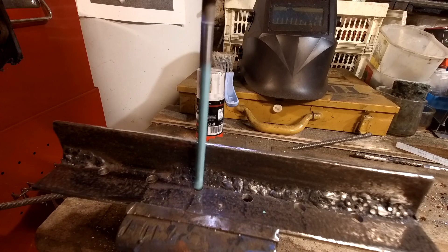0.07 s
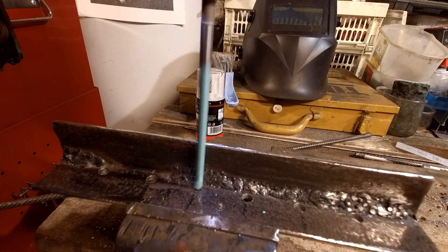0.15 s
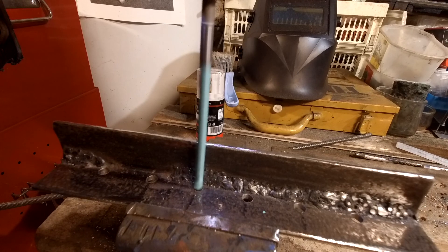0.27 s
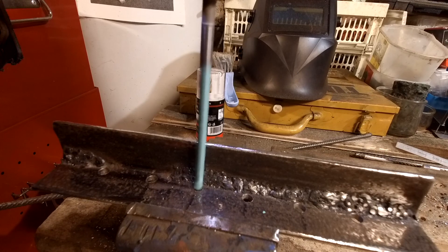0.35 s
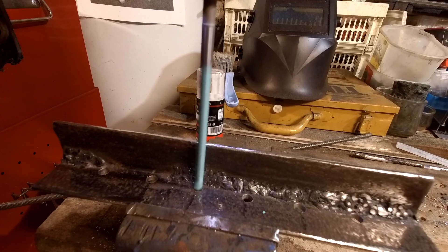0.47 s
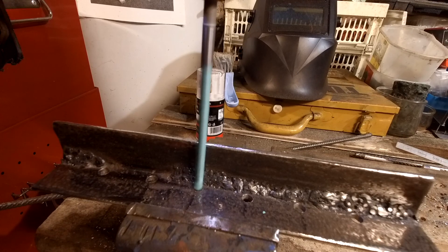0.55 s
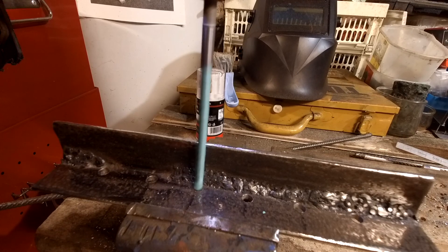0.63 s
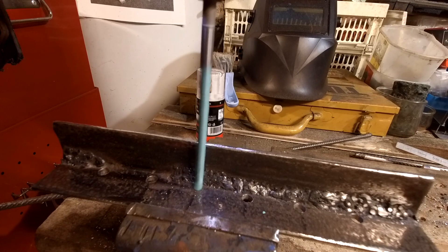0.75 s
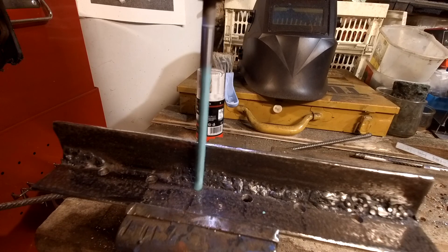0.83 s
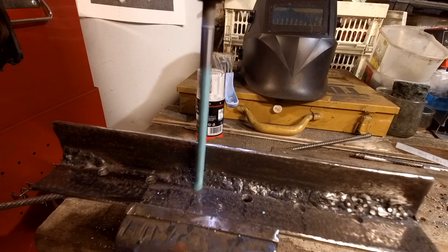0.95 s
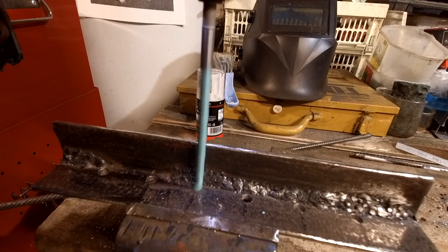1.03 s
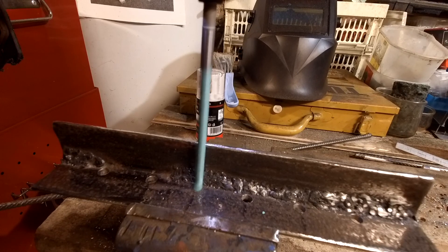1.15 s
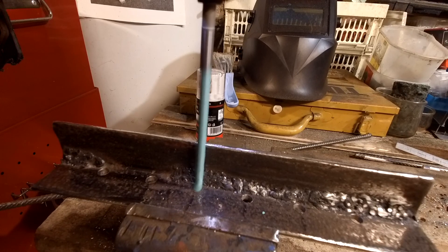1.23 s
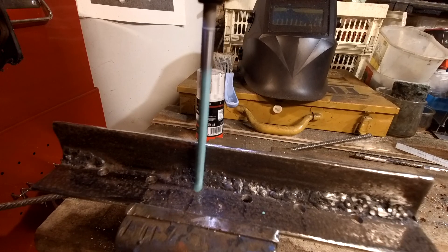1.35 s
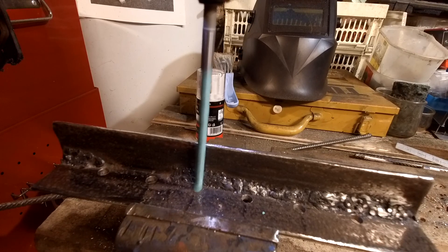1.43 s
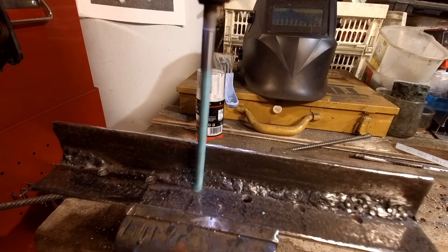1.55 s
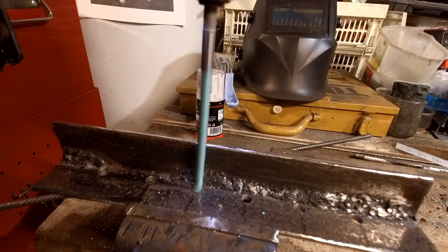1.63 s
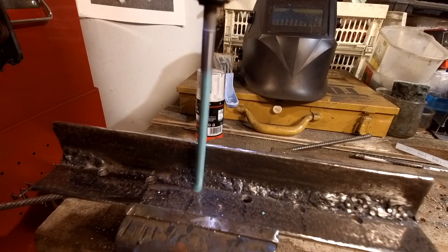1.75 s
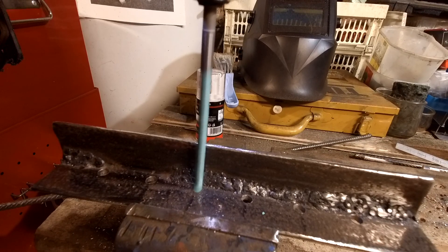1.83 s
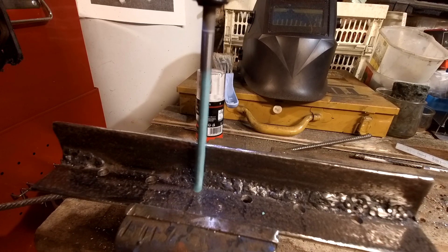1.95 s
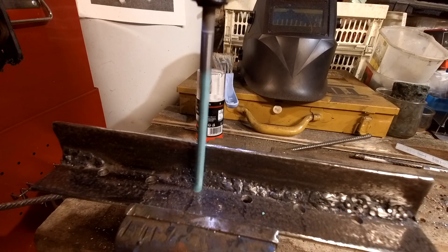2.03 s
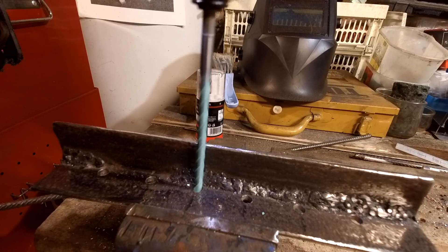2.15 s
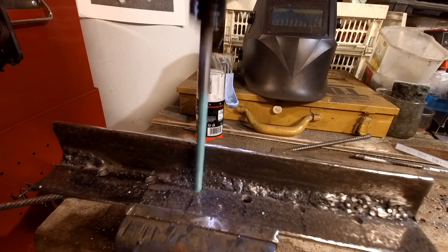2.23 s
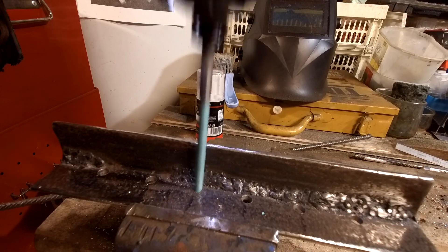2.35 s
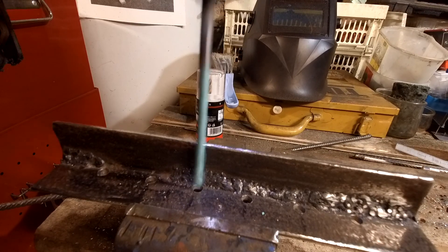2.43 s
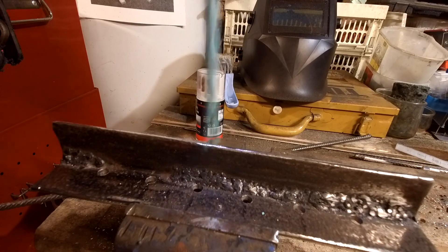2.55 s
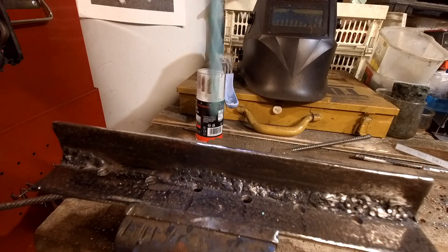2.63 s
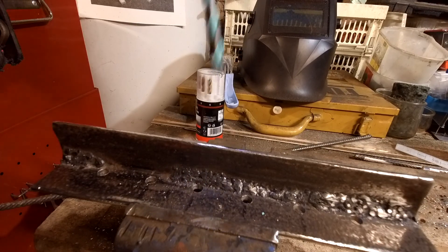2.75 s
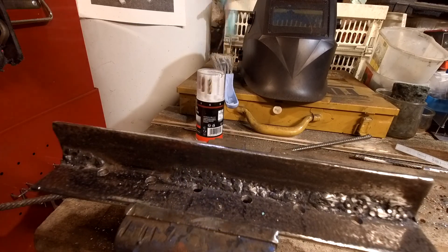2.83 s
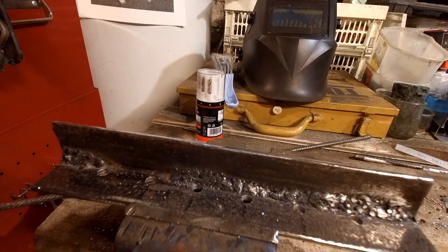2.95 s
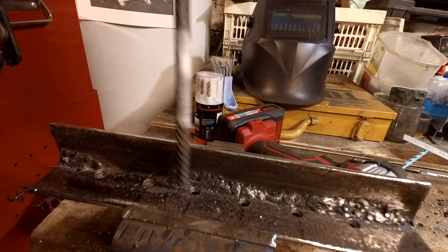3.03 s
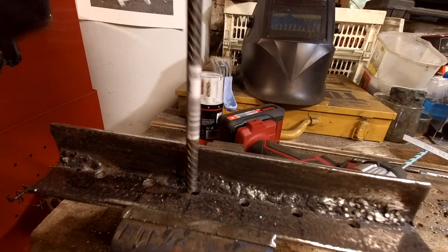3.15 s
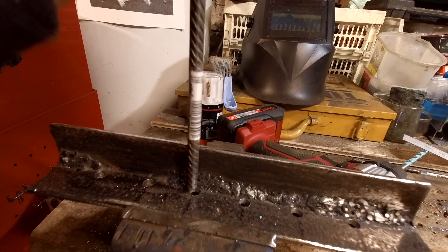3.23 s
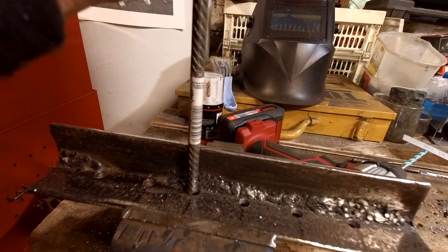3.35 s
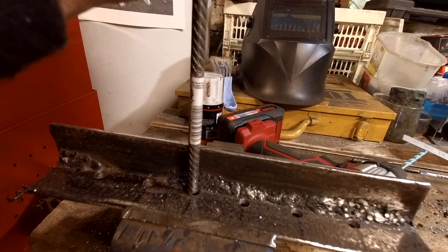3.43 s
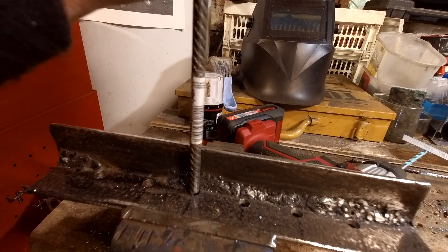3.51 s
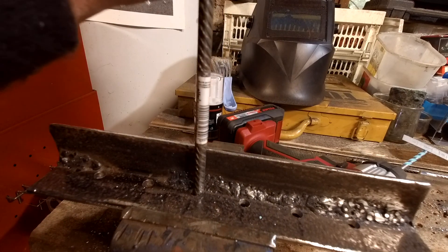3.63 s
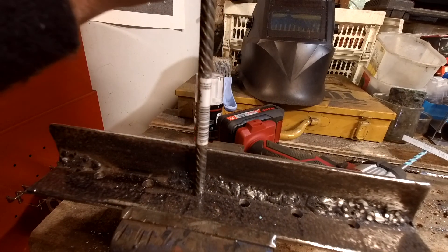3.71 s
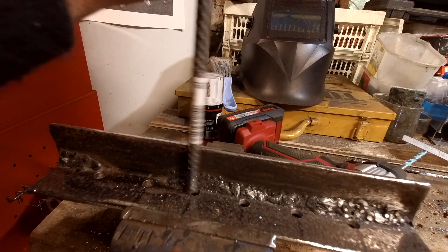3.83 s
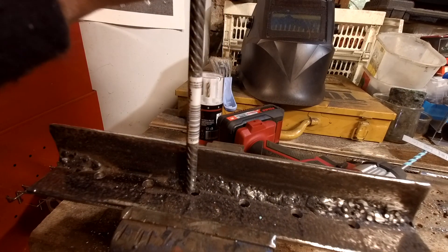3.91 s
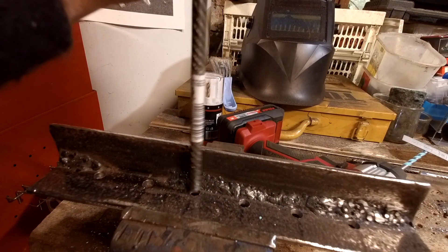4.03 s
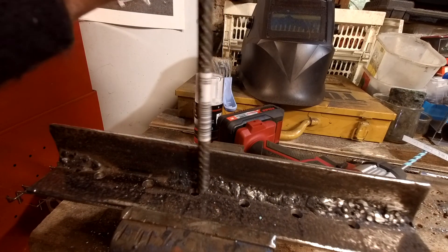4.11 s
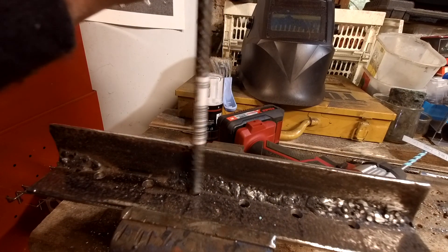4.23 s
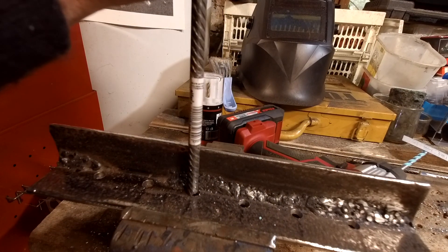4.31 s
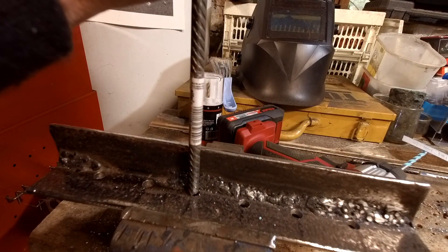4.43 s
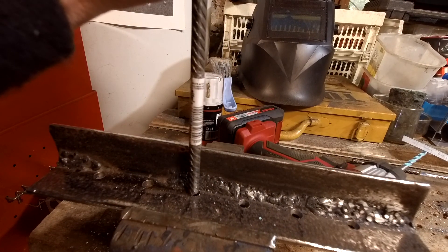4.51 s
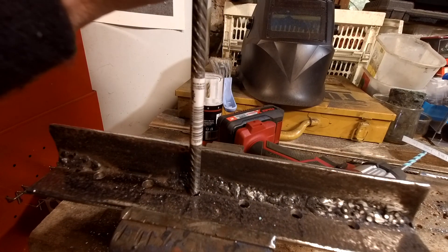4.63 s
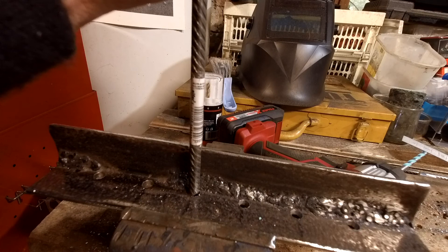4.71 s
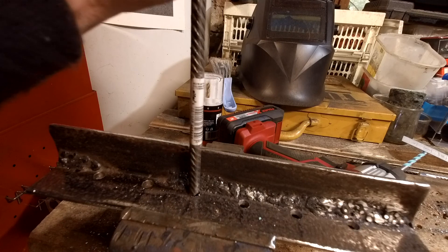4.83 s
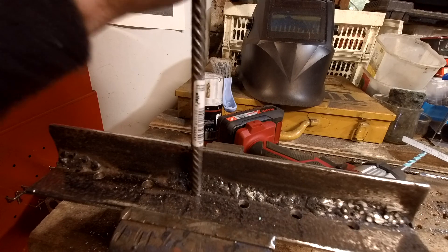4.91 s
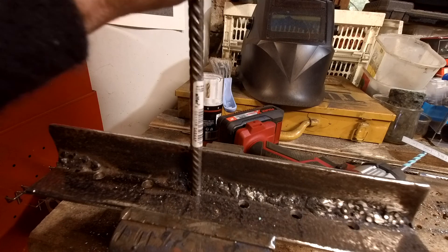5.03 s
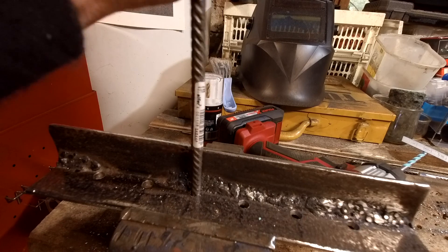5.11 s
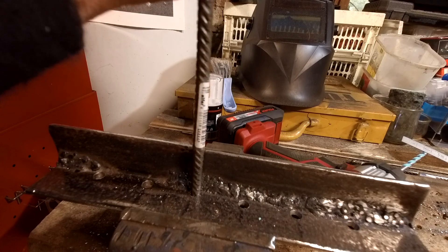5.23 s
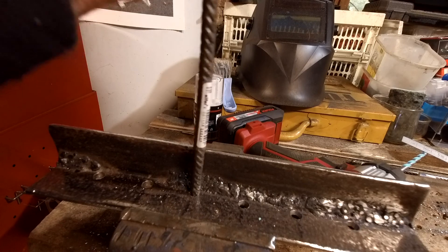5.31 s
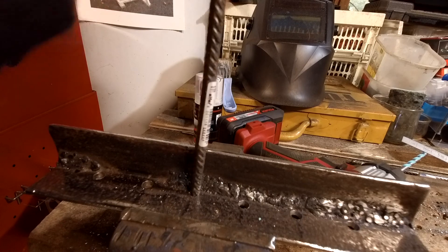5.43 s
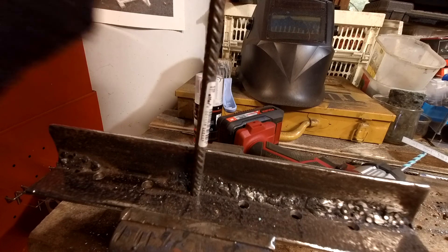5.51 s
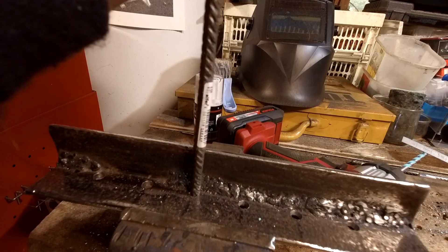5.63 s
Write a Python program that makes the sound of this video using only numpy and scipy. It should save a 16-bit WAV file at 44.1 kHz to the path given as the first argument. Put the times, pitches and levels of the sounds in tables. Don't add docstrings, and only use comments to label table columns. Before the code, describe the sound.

Loud gritty drilling from the very start: whining motor, tearing metal, bright snapping chips, peaks flattened at the close microphone. The pitch sags under load, jumps up at breakthrough, catches with a short harsh grunt, then drops quickly to silence. A low room rumble remains, with irregular small knocks of rod on bar, a faint dry rub and a final crisp click in a short, dull room echo.

```python
import sys
import numpy as np
from scipy import signal
from scipy.fft import rfft, irfft
from scipy.io import wavfile
from scipy.ndimage import uniform_filter1d

SR = 44100
rng = np.random.default_rng(int(sys.argv[2]) if len(sys.argv) > 2 else 0)


def magnitude_from_level(level_db):
    exponent = np.asarray(level_db, float) / 20
    return 10 ** exponent


def waveform_to_disk(signal):
    frames = np.transpose(np.atleast_2d(signal))
    scaled = np.clip(frames, -1, 1) * 32767
    samples = np.round(scaled).astype(np.int16)
    wavfile.write(sys.argv[1], SR, samples)


N = 249605
TIME = np.arange(N) / SR
RUN = int(2.85 * SR)
GEAR = 19.5
BREAKTHROUGH_S = 2.183
RUB_DB = -33.5
SNAG_S, SNAG_HOLD_S, SNAG_FADE_DB_S = 2.348, 0.016, 700

# time in seconds, pole whine in Hz, whine level in dB, gear mesh level in dB.
BORING = [(0, 2965, -19.5, -5), (.07, 2936, -20, 6), (.11, 2875, -38, -9), (.3, 2845, -27.5, -2.5),
          (.46, 2832, -27.5, -1.5), (.5, 2673, -35.5, -5), (.62, 2724, -23.5, 2), (.75, 2602, -29, 2),
          (.88, 2710, -28, -2), (1.0, 2641, -26.5, 0.5), (1.2, 2660, -26, 0.5), (1.36, 2601, -26, -0.5),
          (1.47, 2653, -25.5, -0.5), (1.62, 2608, -23.5, 0), (1.84, 2582, -27, -0.5),
          (1.93, 2466, -24.5, -2), (2.165, 2599, -35.5, -7.5)]
# time in seconds, pole whine in Hz, whine level in dB, gear mesh in dB.
RUNNING_FREE = [(2.21, 2948, -30, 0), (2.35, 2980, -31, 2.5), (2.38, 2825, -30, 0), (2.42, 2960, -46, 0.5),
                (2.46, 3052, -27, 2), (2.535, 3093, -21.5, 3.5), (2.56, 3094, -25, 0),
                (2.585, 2985, -25.5, -1.5)]
# frequency in Hz, level in dB per Hz.
SIZZLE = [(2940, -33.5), (5000, -1), (5530, 1.5), (8560, -5), (9700, 0), (10600, -3.5), (12800, -2.5),
          (14500, -3), (15400, -7), (15900, -28)]


def curves(table, size=N):
    s, *columns = np.transpose(table)
    return [np.interp(TIME[:size], s, c) for c in columns]


def unit(x):
    return x / np.sqrt(np.mean(x ** 2))


def colour(x, points):
    hz, db = np.transpose(points)
    grid_hz = np.linspace(1, SR / 2, 4097)
    log_gain = np.interp(np.log(grid_hz), np.log(hz), db) * np.log(10) / 20
    ceps = irfft(log_gain)
    ceps[1:4096] *= 2
    ceps[4097:] = 0
    response = irfft(np.exp(rfft(ceps)))
    return signal.fftconvolve(x, response)[:len(x)]


def ring(x, hz, width):
    return signal.lfilter(*signal.iirpeak(hz, hz / width, fs=SR), x)


def walk(rate, size=N):
    k = int(SR / rate)
    held = np.repeat(rng.standard_normal(N // k + 1), k)[:size]
    return 1.2 * uniform_filter1d(held, k)


def grit(scatter_db, size=N):
    return unit(rng.standard_normal(size) * magnitude_from_level(scatter_db * rng.exponential(size=size)))


def add(out, s, x):
    i = round(s * SR)
    out[i:i + len(x)] += x[:N - i]


def swell(s, attack_s, hold_s, fade_db_s):
    t = TIME[:RUN] - s
    return np.clip(t / attack_s, 0, 1) * magnitude_from_level(-fade_db_s * np.maximum(t - attack_s - hold_s, 0))


def resonate(force, table):
    out = 0
    for hz, width, db in table:
        wane = magnitude_from_level(2.2 * walk(35, RUN))
        out = out + wane * magnitude_from_level(db) * np.sqrt(width) * unit(ring(force, hz, width))
    return unit(out)


def hum():
    # frequency in Hz, level in dB per Hz.
    air_colour = [(12, -21.5), (20, -2), (44, -4.5), (65, -16), (130, -7.5), (162, -20), (247, -6.5),
                  (355, -7), (419, -8), (539, -17), (603, -17.5), (693, -17), (891, -21), (13700, -54),
                  (15800, -60.5)]
    # frequency in Hz, level in dB.
    machine_lines = [(35, -69), (128, -64.5), (345, -66.5), (544, -64), (1120, -70), (2256, -74),
                     (6551, -97.5)]
    air = unit(colour(rng.standard_normal(N), air_colour))
    rumble = signal.sosfilt(signal.butter(2, 700, fs=SR, output="sos"), air)
    air = air + rumble * (magnitude_from_level(1.1 * walk(10)) - 1)
    lines = 0
    for hz, db in machine_lines:
        drift = .004 * hz ** 0.73 * walk(31)
        lines = lines + magnitude_from_level(db + 52.5 + 1.5 * walk(10)) * np.sin(2 * np.pi * hz * TIME + drift)
    faint_hiss = magnitude_from_level(-47) * unit(ring(air, 6650, 250))
    early_db = -3.5 * np.clip(.5 - (TIME - 3.05) / 0.066, 0, 1)
    return magnitude_from_level(-48 + early_db) * (air + lines + faint_hiss)


def whine(table, turns, hz, load):
    # frequency in Hz, width in Hz, lift in dB.
    casing = [(210, 160, -14), (740, 150, 8), (1320, 200, 5), (2670, 200, 8), (3480, 500, 5),
              (5250, 1000, -20)]
    out, spin = 0, 2 * np.pi * turns / GEAR
    for k, db, wobble_db, blur in table:
        lift_db = sum(up_db / (1 + (2 * (k * hz - f) / w) ** 2) for f, w, up_db in casing)
        throb = (.7 + .8 * load) * np.sin(2 * spin + k) + load * np.sin(4 * spin + k)
        throb = throb + (0.3 + 0.25 * load) * walk(120, RUN)
        shake = (.4 + 1.2 * load) * walk(150, RUN) + 2.8 * load * np.sin(2 * spin + k)
        phase = 2 * np.pi * k * turns + blur * shake
        out = out + magnitude_from_level(db + lift_db + wobble_db * throb) * np.sin(phase)
    return np.sqrt(2) * out


def motor_tones(turns, hz, load, octaves):
    # multiple of rotor speed, level in dB, wobble in dB, phase blur in radians.
    poles = [(2, -24, 3, .9), (8, -2, 1.6, 0.45)]
    gears = [(1.8, -11, 4, 1.4), (5.1, -5, 4, 1.6), (10.75, 2.5, 3.4, 1.3), (21.2, -16, 4, 5),
             (26.4, -19, 4, 5.5), (30, -32, 2, .6)]
    slots = [(4, -4.5, 2.5, 0.098), (16, -7.5, 6, 2)]
    unbalance = [(1, 0, 1.2, .2), (.5, -12, 3, .3)]
    squeal = [(16, 0, 1, .2)]
    _, pole_db, mesh_db = curves(BORING + RUNNING_FREE, RUN)
    jolt = swell(2.6005, attack_s=.003, hold_s=.0075, fade_db_s=3000)
    pole_db = pole_db - 17.5 * octaves + 8.5 * jolt
    gear_db = mesh_db - 38.5 + 11 * load - 21 * octaves
    slot_db = -31 - 6 * octaves
    shake_db = -33.5 - 3.5 * load - 20 * octaves
    tones = magnitude_from_level(pole_db) * whine(poles, turns, hz, load)
    tones = tones + magnitude_from_level(gear_db) * whine(gears, turns, hz, load)
    tones = tones + magnitude_from_level(slot_db) * whine(slots, turns, hz, load)
    tones = tones + magnitude_from_level(shake_db) * whine(unbalance, turns, hz, load)
    squeal_gain = magnitude_from_level(-34) * swell(2.631, attack_s=0.004, hold_s=0.012, fade_db_s=2500)
    return tones + squeal_gain * whine(squeal, turns, hz, load)


def fan(turns, load, octaves):
    # frequency in Hz, level in dB per Hz.
    fan_colour = [(24, -46), (40, -22.5), (327, -32), (380, -11), (1330, -13.5), (1540, -8), (2880, -11.5),
                  (3110, -7.5), (3350, -11), (4200, -12), (5000, -22), (6260, -26.5), (15800, -59.5)]
    beat = 1 + 0.4 * np.sin(2 * np.pi * turns)
    rush = grit(1.0, RUN) * beat * magnitude_from_level(walk(40, RUN))
    return magnitude_from_level(-28 - 6 * load - 4.5 * octaves) * unit(colour(rush, fan_colour))


def brushes(octaves):
    sparks = grit(1.8, RUN) * magnitude_from_level(3.6 * walk(130, RUN))
    hiss = unit(ring(ring(sparks, 7600, 5600), 7600, 5600))
    return magnitude_from_level(-42.5 - 35 * octaves) * hiss


def brake():
    # frequency in Hz, width in Hz, level in dB.
    shudder_modes = [(734, 102, -21), (1670, 530, 2), (2730, 630, 2), (3500, 107, 0.5), (4300, 400, -31)]
    # time in seconds, frequency in Hz, level in dB, length in seconds.
    part_rings = [(2.653, 735, -26, 0.0053), (2.616, 1290, -22, .003), (3, 2700, -11, .003),
                  (2.1, 3300, -3, .003), (2.654, 2670, -22.5, 0.0044), (2.2, 3100, -22, .005),
                  (2.637, 480, -29, 0.0042), (2.58, 11550, -60, .016)]
    t = TIME[:RUN]
    shudder = swell(2.632, attack_s=0.023, hold_s=0.015, fade_db_s=900)
    shudder = shudder + magnitude_from_level(-22.5) * swell(2.632, attack_s=0.023, hold_s=0.051, fade_db_s=300)
    out = magnitude_from_level(-31) * shudder * ring(resonate(grit(2.0, RUN), shudder_modes), 2200, 4100)
    for s, hz, db, length_s in part_rings:
        out = out + magnitude_from_level(db) * np.exp(-((t - s) / length_s) ** 2) * np.sin(2 * np.pi * hz * t)
    return out


def motor(turns, hz, load, octaves):
    stop = np.clip((2.69 - TIME[:RUN]) / 0.023, 0, 1) ** 2
    running = motor_tones(turns, hz, load, octaves) + fan(turns, load, octaves) + brushes(octaves)
    return running * stop + brake()


def contact():
    # time in seconds, cutting level in dB.
    feed = [
        (0, -26.5),
        (.24, -21.5),
        (.64, -18.5),
        (1.0, -16.5),
        (1.26, -17),
        (2.05, -13.5),
        (2.12, -10),
        (2.165, -14.5),
        (2.183, -34.5),
    ]
    # time in seconds, change in dB, length in seconds.
    catches = [(0.129, 4, 0.1), (0.68, 2.5, 0.099), (0.859, -7.5, 0.011), (1.027, 3.5, 0.03),
               (1.111, -3.5, 0.061), (1.134, 3, 0.03), (2.109, -5, 0.014), (2.18, 3.5, 0.0079),
               (2.228, 6.5, 0.01), (2.256, 12, 0.0074), (2.279, 5.5, 0.0098), (2.3, 12, 0.014),
               (2.331, 13.5, 0.0065)]
    t = TIME[:RUN]
    catch_db = sum(db * np.exp(-(2 * (t - s) / d) ** 2) for s, db, d in catches)
    rub = magnitude_from_level(RUB_DB - 499 * np.maximum(t - 2.39, 0))
    rise_db = 9.5 * np.clip((t - SNAG_S) / SNAG_HOLD_S - 1, -1, 0)
    snag = magnitude_from_level(-10 + rise_db) * swell(SNAG_S, .002, SNAG_HOLD_S, SNAG_FADE_DB_S)
    loose_db = 20 * np.log10(rub + snag)
    return catch_db + np.where(t < BREAKTHROUGH_S, curves(feed, RUN)[0], loose_db)


def cutting(turns):
    # frequency in Hz, width in Hz, level in dB.
    bar_modes = [(846, 13, 3), (1156, 34, -4.5), (1309.4, 27.8, 5.5), (1624, 28, 2.5), (1710, 31, -16.5),
                 (2410, 50, -2), (3000, 17, -14.5), (2956, 59, 7.5), (3250, 79, 4), (3960, 5.7, -12.5),
                 (5040, 150, -4.5), (5330, 21, -5.5), (5290, 23, -10.5)]
    bench_modes = [(282, 17, -6), (306, 22, 2), (417.5, 36, 0), (610, 350, -6)]
    bit_modes = [(5500, 410, 2), (6730, 200, 6), (8300, 140, -8), (9860, 280, 2), (12600, 540, -8),
                 (14380, 760, 3)]
    # frequency in Hz, level in dB per Hz.
    tearing_colour = [(15, -46), (25, -17.5), (137, -27.5), (404, -4.5), (523, -9), (839, 0), (1040, -2.5),
                      (1310, -1.5), (2600, 0.5), (2790, 0), (3450, -1.5), (4170, -5.5), (7000, -24.5),
                      (9100, -41.5), (15400, -120)]
    cut_db = contact()
    spin = 2 * np.pi * turns / GEAR
    free = TIME[:RUN] > BREAKTHROUGH_S
    feed_db = (cut_db + 17.5) * ~free
    treble_db = -7.5 - 4.0 * free - 0.02 * feed_db
    bench_db = -8 + 1.2 * free - 1.1 * feed_db
    bite_db = 0.6 * np.sin(spin) + (1.2 + 3.0 * free) * np.sin(2 * spin + 2.5)
    bite_db = bite_db + 1.1 * np.sin(4 * spin + walk(6.5, RUN))
    burst_db = bite_db + .8 * walk(15, RUN) + 2.0 * walk(90, RUN)
    snag = swell(SNAG_S - SNAG_HOLD_S, SNAG_HOLD_S / 2, 2 * SNAG_HOLD_S, SNAG_FADE_DB_S)
    burst_db = burst_db * (1 - .7 * snag)
    force = grit(1.8, RUN) * magnitude_from_level(0.9 * burst_db)
    body = magnitude_from_level(-1.0 + 0.2 * feed_db) * resonate(force, bar_modes)
    body = body + magnitude_from_level(3.5) * unit(colour(force, tearing_colour))
    body = body + magnitude_from_level(bench_db - 5.0) * resonate(force, bench_modes)
    chips = grit(2.5, RUN)
    chips = chips * magnitude_from_level(0.45 * burst_db + 3.2 * walk(300, RUN) + 1.2 * walk(110, RUN))
    sizzle = unit(colour(chips, SIZZLE)) + magnitude_from_level(-9.0 + 10.0 * free) * resonate(chips, bit_modes)
    return magnitude_from_level(cut_db + 0.5) * (body + magnitude_from_level(treble_db) * sizzle)


def blows(table, fade_s):
    s, db = np.transpose(table)
    kick = np.zeros(RUN)
    kick[(s * SR).astype(int)] = magnitude_from_level(db)
    return signal.lfilter([1], [1, -np.exp(-1 / (fade_s * SR))], kick)


def snapping():
    # time in seconds,
    # level in dB.
    snaps = [(0.0254, -29), (0.0545, -7), (0.104, -9), (0.1171, -15.5), (0.2214, -15.5), (0.255, -14.5),
             (0.2927, -22), (0.3104, -21.5), (0.3296, -4.5), (0.376, -10), (0.4205, -21), (0.4386, -16),
             (0.4506, -12), (0.4773, -17.5), (0.5185, -16.5), (0.5432, -10.5), (0.5863, -15), (0.6435, -10),
             (0.8175, -13), (0.8413, -13), (0.8625, -11), (0.9023, -6), (0.9223, -6.5), (0.9437, -12),
             (0.9567, -12.5), (1.0216, -12), (1.0967, -13.5), (1.1118, -8.5), (1.1252, -9.5), (1.1455, -9),
             (1.2997, -15.5), (1.3314, -14.5), (1.4746, -16.5), (1.487, -13.5), (1.505, -13),
             (1.5286, -13.5), (1.5933, -13), (1.6244, -12.5), (1.6397, -10), (1.6831, -12.5),
             (1.7125, -12.5), (1.7965, -7.5), (1.8497, -12.5), (1.8695, -14), (1.918, -8.5), (1.9753, -14),
             (2.002, -12), (2.0353, -14), (2.0519, -11.5), (2.0914, -8.5), (2.116, -6.5), (2.142, -4.5),
             (2.1791, -9), (2.3002, -20), (2.3501, -10.5),
             (2.1746, -12), (2.2228, -27.5), (2.2305, -26), (2.2478, -17), (2.267, -17),
                   (2.279, -21.5), (2.3266, -27.5)]
    # time in seconds, level in dB.
    bites = [(0.061, -20), (0.097, -18), (0.177, -9), (0.219, -13.5), (0.259, -13), (0.339, -13),
             (0.415, -14.5), (0.469, -12), (0.498, -17.5), (0.58, -10.5), (0.612, -23), (0.663, -6),
             (0.726, -8.5), (0.769, -21), (0.817, -20), (0.92, -20), (0.955, -16), (1.06, -15.5),
             (1.187, -16.5), (1.27, -18.5), (1.33, -21.5), (1.371, -15.5), (1.414, -12.5), (1.505, -14.5),
             (1.569, -17), (1.651, -15.5), (1.702, -10.5), (1.735, -16), (1.78, -16), (1.832, -14),
             (1.937, -8.5), (1.981, -15), (2.048, -15), (2.106, -9), (2.368, -10)]
    # frequency in Hz, width in Hz, level in dB.
    shank_modes = [(9950, 80, 0), (12700, 160, -1.5), (14310, 240, 1.5)]
    spit = grit(1.4, RUN) * blows(snaps, fade_s=0.0042)
    shank = sum(magnitude_from_level(db + 3) * ring(spit, hz, width) for hz, width, db in shank_modes)
    dig = rng.standard_normal(RUN) * blows(bites, fade_s=0.0066)
    web_hz, web_width_hz = 831, 71
    web = ring(dig, web_hz, web_width_hz) * np.sqrt(SR / np.pi / web_width_hz)
    return magnitude_from_level(-9) * (colour(spit, SIZZLE) * magnitude_from_level(4.5) + shank) + magnitude_from_level(-1.5) * web


def rattle_of_gears(turns, hz, load):
    # multiple of rotor speed, level in dB, wobble in dB, phase blur in radians.
    gear_knocks = [(.7, 12, 1, .2), (16, 4, 5, 4), (21.3, -6, 5, 5), (26.6, -6, 5, 6)]
    free = (TIME[:RUN] > BREAKTHROUGH_S) & (TIME[:RUN] < SNAG_S)
    knock_db = 1.6 * np.minimum(contact() - RUB_DB, 9)
    return free * magnitude_from_level(-45 + knock_db) * whine(gear_knocks, turns, hz, load)


def drill():
    driven_hz = curves(BORING + RUNNING_FREE, RUN)[0]
    sag = (3017 - driven_hz) / 325.7
    load = np.clip(sag, .1, 1)
    strain = np.clip(sag, .1, 2)
    braked_s = uniform_filter1d(np.maximum(TIME[:RUN] - 2.59, 0), int(.04 * SR))
    pole_hz = np.maximum(driven_hz - 24500 * braked_s, driven_hz / 5)
    hz = pole_hz / 8 * (1 + .007 * strain ** 2 * walk(100, RUN))
    turns = np.cumsum(hz) / SR
    octaves = np.log2(driven_hz / pole_hz)
    sound = motor(turns, hz, load, octaves) + cutting(turns)
    return sound + snapping() + rattle_of_gears(turns, hz, load)


def vice():
    out, t = np.zeros(N), TIME[:SR // 2]
    thrum = np.sin(2 * np.pi * 88 * t) * (1 - np.exp(-t / .03)) * np.exp(-t / 0.076)
    add(out, 2.38, magnitude_from_level(-28.5) * thrum)
    return out


def clicks():
    # time in seconds, peak in dB, centre in Hz, width in Hz, tail in dB.
    click_list = [(2.815, -84.5, 6560, 3005, 20.5), (3.001, -72.5, 5020, 4030, 8.5),
                  (3.078, -42.5, 2500, 5000, -29), (5.395, -35, 1850, 700, -24),
                  (5.5407, -28.5, 4170, 2980, -26), (5.5425, -35.5, 12100, 7040, -23.5),
                  (5.541, -36, 1300, 1500, -18), (5.64, -73, 6000, 8000, 8.5)]
    out, t = np.zeros(N), TIME[:SR // 4]
    for s, db, hz, width, tail_db in click_list:
        shape = np.exp(-t / 0.00073) + magnitude_from_level(tail_db) * np.exp(-t / 0.032)
        burst = ring(rng.standard_normal(len(t)) * shape, hz, width)
        burst = ring(burst, hz, min(2 * width, SR / 3))
        add(out, s, magnitude_from_level(db + 0.5) * burst * np.sqrt(SR / 4 / width))
    return out


def struck(table, spread_db, detune):
    t = TIME[:SR // 4]
    hz, db, t60 = np.array(table).T[:, :, None]
    size = magnitude_from_level(db + spread_db * rng.standard_normal(hz.shape))
    hz = hz * (1 + detune * rng.standard_normal(hz.shape))
    decay = np.exp(-np.log(1000) * t / (.75 * t60))
    out = (size * np.sin(2 * np.pi * hz * t) * decay).sum(0)
    return out / np.abs(out).max()


def blow_chatter():
    chatter = rng.standard_normal(1500) * magnitude_from_level(2 * rng.exponential(size=1500))
    chatter *= np.exp(-TIME[:1500] / .0085)
    chatter[:14] += 2.4 * np.hanning(14)
    return chatter / np.sqrt(np.sum(chatter ** 2))


def taps():
    # time in seconds, bar level in dB, rod level in dB, tip level in dB.
    tap_list = [(3.212, -47.5, -47, -74), (3.247, -48, -51, -69.5), (3.349, -72, -55, -68),
                (3.471, -53, -51, -77.5), (3.497, -55.5, -52, -76), (3.563, -59, -48, -64),
                (3.582, -50.5, -43, -66.5), (3.6, -61, -46, -61), (3.621, -52, -46, -61.5),
                (3.636, -41, -60, -69), (3.776, -55, -47, -65), (3.809, -45, -43.5, -66),
                (3.82, -49, -40.5, -55), (3.859, -61, -60, -75), (3.9, -57, -67, -75),
                (3.961, -58, -47, -74), (4.151, -58, -54.5, -76), (4.225, -61, -45, -65),
                (4.244, -49.5, -66, -73.5), (4.272, -71, -56, -73), (4.492, -60, -57, -77),
                (4.781, -59.5, -48.5, -63.5), (4.797, -46, -55, -73.5), (4.828, -46, -51, -77),
                (4.839, -28.5, -69, -78.5), (5.042, -56, -64, -76), (5.229, -55, -52.5, -68.5),
                (5.27, -52.5, -63, -74.5)]
    # time in seconds, level in dB.
    flange_taps = [(3.812, -57), (3.826, -46), (4.802, -50)]
    # frequency in Hz, level in dB, fade in seconds (60 dB are lost in three
    bar_modes = [(285, -6, 0.14), (407, -2, 0.13), (556, -10, 0.05), (662, -6.5, 0.13), (840, 3, 0.11),
                 (1000, -6.5, 0.065), (1200, -6, 0.084), (1325, -3, 0.17), (1870, -21, .05),
                 (2450, -11, 0.11), (2690, -13, 0.073), (2960, -17, 0.18), (3160, -23, 0.079),
                 (3740, -22, 0.04)]
    rod_modes = [(2310, -4, .03), (2710, -1.5, 0.051), (3300, 0, 0.036), (3810, 4, 0.03), (4480, 2, 0.033),
                 (5120, -4, 0.03), (6000, -10, 0.022), (6450, -13, 0.025)]
    tip_modes = [(7300, -5, .025), (8400, -4, .025), (9000, 7, 0.031), (10700, 2, .02), (11400, -3, .02),
                 (12700, -4, .02), (13470, -5, .02), (14550, -8, .02)]
    out, t = np.zeros(N), TIME[:SR // 4]
    flange = np.sin(2 * np.pi * 1650 * t) * np.exp(-t / .01)
    for s, bar_db, rod_db, tip_db in tap_list:
        chatter = blow_chatter()
        flange_db = max(rod_db - 10, bar_db - 24.5)
        steel = magnitude_from_level(bar_db + 11.5) * struck(bar_modes, 1.3, 0.0037)
        steel = steel + magnitude_from_level(flange_db + 4.0) * flange
        steel = steel + magnitude_from_level(rod_db + 5.5) * struck(rod_modes, 2.5, .02)
        steel = steel + magnitude_from_level(tip_db + 11.5) * struck(tip_modes, 3.8, .03)
        add(out, s, signal.fftconvolve(steel, chatter))
        bar_rattle = ring(ring(ring(chatter, 1700, 1900), 1700, 1900), 1700, 1900)
        rod_rattle = ring(ring(ring(chatter, 4000, 5000), 4000, 5000), 4000, 5000)
        tip_rattle = ring(ring(chatter, 10500, 8900), 10500, 9000)
        rattle = magnitude_from_level(bar_db + 21) * bar_rattle + magnitude_from_level(rod_db + 19.5) * rod_rattle
        add(out, s, rattle + magnitude_from_level(tip_db + 16.0) * tip_rattle)
    for s, db in flange_taps:
        add(out, s, magnitude_from_level(db + 6) * signal.fftconvolve(flange, blow_chatter()))
    return out


def scraping():
    # time in seconds, level in dB.
    stroke = [
        (4.0, -70.5),
        (4.1, -53.5),
        (4.36, -47),
        (4.5, -55),
        (4.8, -57),
    ]
    # frequency in Hz, level in dB per Hz.
    scrape_colour = [(530, -48), (900, -24.5), (1220, -17), (1330, 1), (1750, 0), (2470, -11.5),
                     (3150, -11), (6000, -44.5), (7800, -64.5), (13200, -120)]
    on = (TIME > stroke[0][0]) & (TIME < stroke[-1][0])
    slip = grit(1.5) * magnitude_from_level(2.0 * walk(30))
    scrape = unit(colour(slip, scrape_colour)) + magnitude_from_level(-5.0) * unit(ring(slip, 1353, 53.0))
    return on * magnitude_from_level(curves(stroke)[0] - 7.0) * scrape


def handling():
    no_bass = signal.butter(4, 230, "high", fs=SR, output="sos")
    return signal.sosfilt(no_bass, clicks() + taps() + scraping())


def room(near):
    t = TIME[:SR // 2]
    tail = signal.lfilter([1], [1, -.75], rng.standard_normal(len(t)))
    tail = tail * np.exp(-np.log(1000) * t / .24) * (t > .004)
    return magnitude_from_level(-19) * signal.fftconvolve(near, tail / np.sqrt(np.sum(tail ** 2)))[:N]


def scene():
    near = vice() + handling()
    add(near, 0, drill())
    return (near + room(near) + hum())[None]


def roll_off(x):
    return signal.sosfilt(signal.butter(12, 15420, fs=SR, output="sos"), x)


def record(dry):
    clip_level, sheen = .34, .1
    flat = dry / (1 + np.abs(dry / clip_level) ** 8) ** (1 / 8)
    bright = signal.lfilter([1 + sheen, -sheen], [1], flat)
    top_cut = signal.ellip(8, .2, 70, 15380, fs=SR, output="sos")
    return roll_off(signal.sosfilt(top_cut, bright))


dry = scene()
out = record(dry)
waveform_to_disk(out)
```